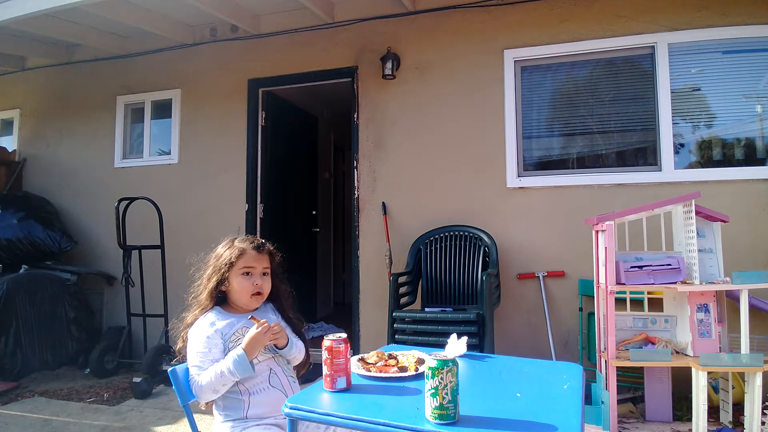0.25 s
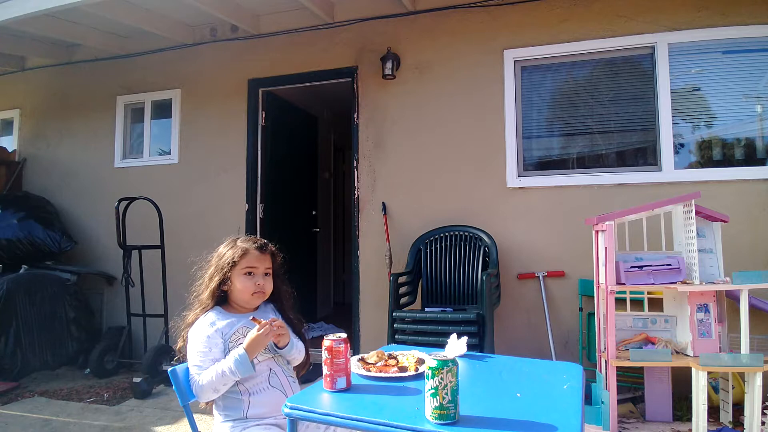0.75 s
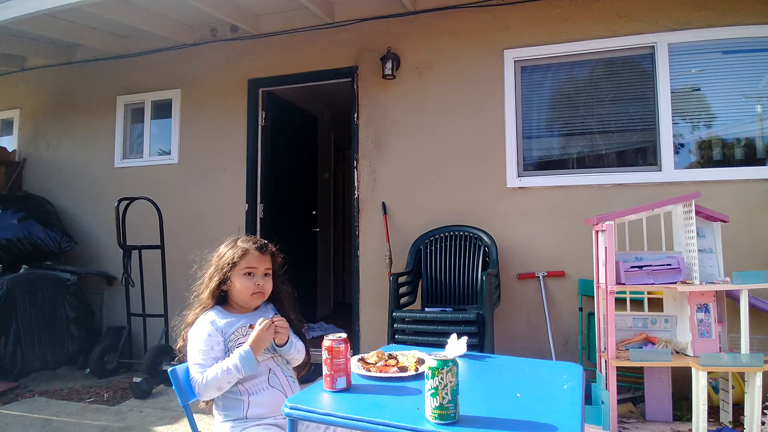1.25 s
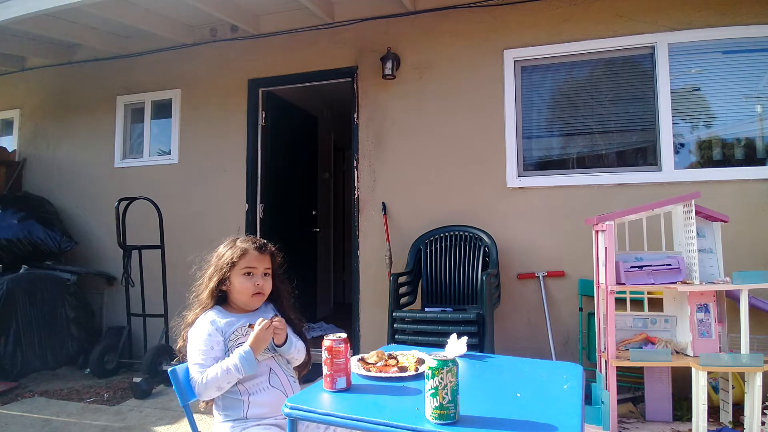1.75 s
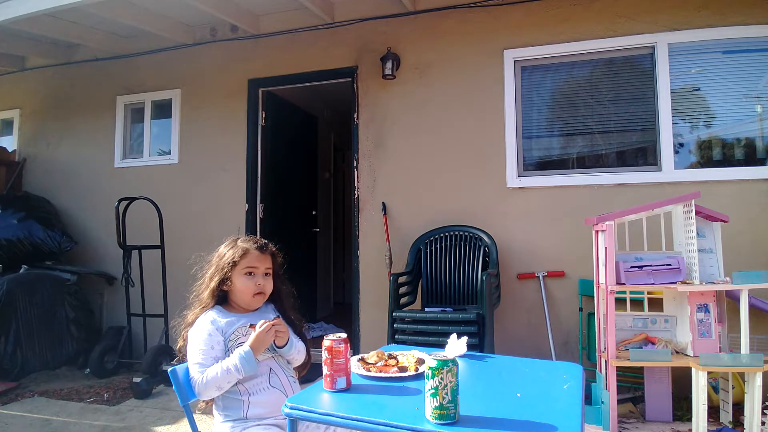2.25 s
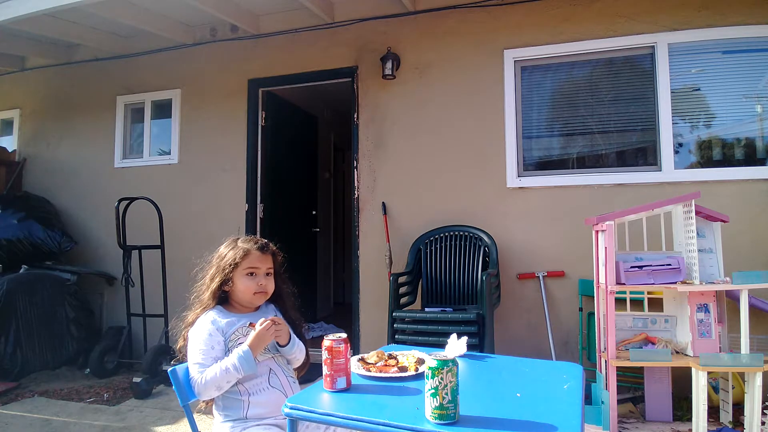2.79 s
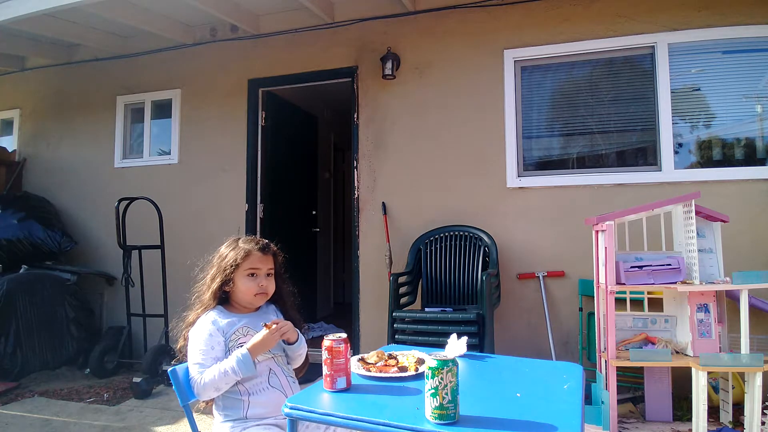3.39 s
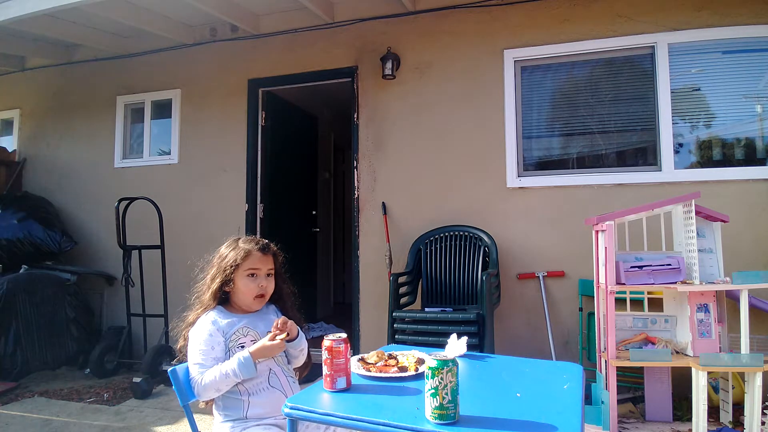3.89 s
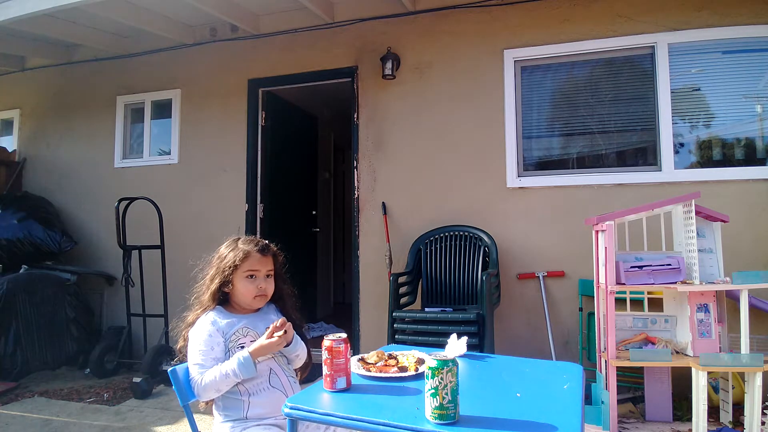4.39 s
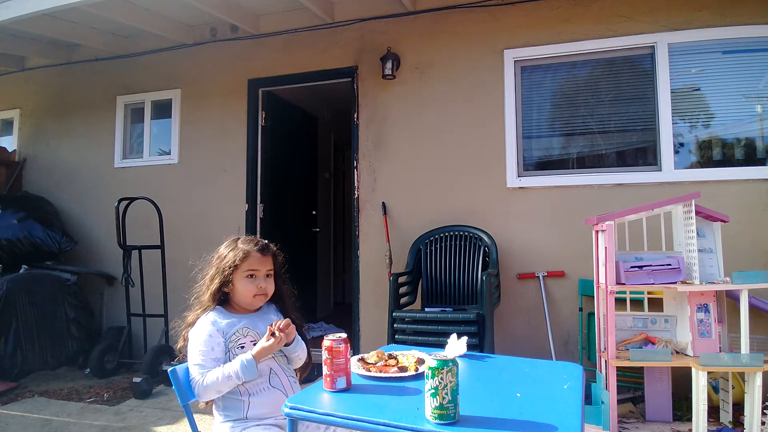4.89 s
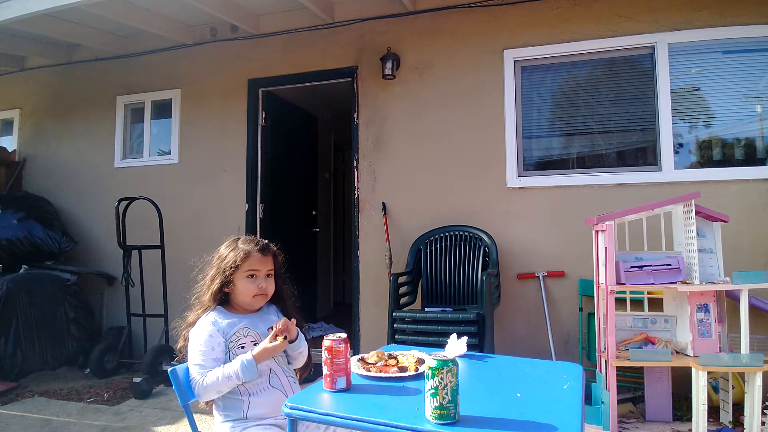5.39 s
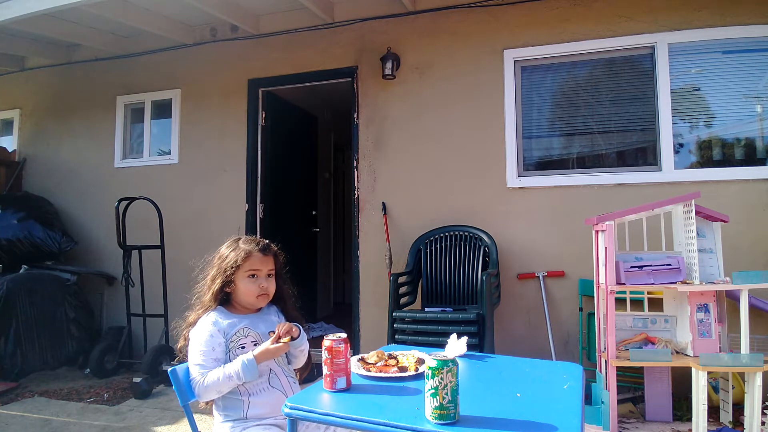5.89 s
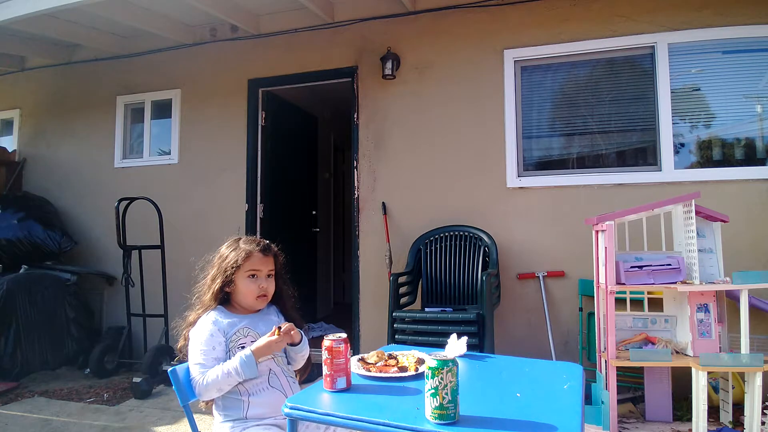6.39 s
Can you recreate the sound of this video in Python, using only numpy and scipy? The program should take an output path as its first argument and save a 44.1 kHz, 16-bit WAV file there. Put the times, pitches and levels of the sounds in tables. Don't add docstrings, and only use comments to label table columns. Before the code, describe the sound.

In an outdoor back yard, a heavy diesel vehicle passes on a street beyond the house. From 0 s a muffled low roar rises quickly, its engine drone around 65 Hz strongest near 1 s, with soft fan hiss and a very faint high turbo whistle slowly climbing. Around 1.6 s the treble opens briefly through a gap; by 2.5 s the sound sags and the drone drops out for a gear change. From 3 s it builds again, clearer, with tyre wash. Tiny chirps and spits begin near 3.8 s. At about 4.3 to 4.5 s, the loudest moment, two short airy valve puffs overlap a small squeak near 4 kHz. Faint spits follow until 5 s. The whistle falls and dies away, the roar recedes, and a firm 70 Hz drone, gently wavering, continues to 6.6 s. Distant stereo pickup, with thinned treble.

```python
import sys
import numpy as np
from scipy import signal
from scipy.io import wavfile
from scipy.ndimage import uniform_filter1d

SR = 44100
rng = np.random.default_rng(int(sys.argv[2]) if len(sys.argv) > 2 else 0)


def generate_wav(signal):
    frames = np.transpose(np.atleast_2d(signal))
    scaled = np.clip(frames, -1, 1) * 32767
    pcm = np.round(scaled).astype(np.int16)
    wavfile.write(sys.argv[1], SR, pcm)


N = 293265
T = np.arange(N) / SR

# time_s, direct_view_share (0-1), left_lead_samples
VIEW = [(0, 0, 4.9), (2.3, 0.1, 1.3), (3.1, 0.5, 0.73), (4.2, 1, 0.47), (4.8, 0.89, 4.2),
        (6.65, 0.54, 2.66)]
# time_s, nearness_db
NEARNESS = [(0, -11), (.15, -7), (.6, -5), (1, 0), (1.55, 0.5), (2.1, -1.5), (2.55, -3), (3.05, 0),
            (3.6, 1), (4.4, 7.5), (4.9, 7), (5.4, 4), (5.9, 1), (6.3, -2), (6.65, -5)]
# time_s, half_length_s, level_db
GAPS = [
    (1.626, 0.44, 8),
    (3.052, 0.31, 7),
    (4.8, .06, 5),
    (5.026, 0.071, 3),
]
# level_db (at nearness 0), nearness_share, full_view_gain_db, drift_db_per_s, gap_share
LAYERS = [
    (-47, 0.85, -2, 0.64, .1),
    (-50.5, 1.18, -2.5, 0.61, -0.056),
    (-57, 0.83, 7.5, -0.2, 0.27),
    (-63, 0.77, 3, 0, 0.45),
    (-83, 0.34, 24.5, -3, 1.2),
]
LAYER_EDGES_HZ = [300, 1000, 3250]
# pitch_hz, level_db_per_hz
SCREENED_COLOUR = [(26, -42), (45, -10), (70, -6), (96, -3), (134, 1.5), (299, -14.5), (327, -17),
                   (433, -16.5), (527, -20.5), (731, -15.5), (833, -18.5), (2820, -33), (3300, -39),
                   (4450, -36), (4970, -29), (8200, -37.5), (10700, -72), (18000, -120)]
# pitch_hz, level_db_per_hz
OPEN_COLOUR = [(26, -44), (45, -19), (57, -1.5), (75, -20), (98, 3), (182, -15.5), (208, -13.5),
               (378, -21.5), (493, -23.5), (551, -18), (981, -33), (2540, -30.5), (3550, -38.5),
               (5910, -39.5), (9000, -44), (11700, -79), (19800, -120)]
# pitch_hz, likeness (0-1)
STEREO_LIKENESS = [(60, 0.99), (150, 0.98), (380, 0.96), (950, 0.83), (2380, 0), (5980, 0.32), (15000, 0.0)]
# pitch_hz, left_minus_right_db
STEREO_TILT = [(60, -0.5), (150, -0.5), (380, 0.5), (950, -2.5), (2380, -4), (5980, -6.0), (15000, -15.5)]
# time_s, pitch_hz, level_db
DRONE = [
    [(0, 67, -59), (.45, 64, -51), (.92, 64.7, -43), (1.58, 66.9, -52.5), (2.05, 68, -50),
     (2.35, 63.6, -57)],
    [(4.0, 70.6, -65), (4.4, 70.1, -40.5), (4.8, 71.34, -34.5), (5.2, 70.8, -27.5), (5.9, 69.6, -28.5),
     (6.65, 71.2, -30.5)],
]
# time_s, depth_db
ECHO_NULLS = [
    (1.84, 17),
    (4.56, 8),
    (5.37, 5),
    (6.1, 5),
    (6.46, 3.5),
]
# start_s, end_s, start_pitch_hz, end_pitch_hz, width_hz
ORDERS = [(.7, 2.2, 131, 136, 5), (-.4, 2.3, 185, 181, 3), (.2, 2, 262, 260, 7), (.5, 1.6, 292, 302, 8),
          (1, 2.1, 422, 440, 14), (0, 2.6, 705, 760, 20), (.4, 1.1, 1290, 1290, 70), (3.0, 3.6, 78, 84, 6),
          (3.3, 4.9, 94, 97, 3), (2.9, 5.5, 180, 181, 6), (2.8, 4.8, 240, 250, 5), (4.7, 6, 264, 258, 5),
          (4.4, 5.9, 385, 375, 8), (3.3, 5.5, 566, 550, 16), (3.4, 5.4, 605, 610, 14),
          (5.3, 6.2, 615, 600, 35), (5.4, 7, 590, 575, 35), (3.4, 6, 768, 785, 12), (4.6, 7.2, 123, 126, 3),
          (0, 3.6, 2800, 2850, 120), (4.5, 6.9, 143, 141, 4), (.55, 2.1, 485, 500, 14)]
ORDER_LEVELS = [-46, -54, -54, -54.5, -55.5, -57, -61.5, -48, -48, -47.5, -55, -47.5, -48, -49.5, -53, -48,
                -55, -54, -52, -70, -63, -61]
# time_s, pitch_hz, level_db
TURBO = [(0, 7740, -71.5), (.55, 7880, -73.5), (1.2, 8360, -74), (1.75, 8770, -73.5), (2.5, 9120, -75),
         (3.5, 9420, -72), (4.1, 9750, -69.5), (4.5, 9800, -68), (4.9, 9740, -74), (5.2, 9420, -75),
         (5.6, 8764, -87), (6.65, 7450, -98)]
# start_s, loudest_s, end_s, level_db
UPPER_WHISTLE = [
    (1.0, 1.697, 2.9, -73),
    (2.1, 3.201, 5.2, -75.5),
]
# pitch_hz, level_db_per_hz
INTAKE_COLOUR = [(5590, -30), (9500, -1), (10600, -5.5), (11900, -4.5), (14300, -2.5), (15100, -7),
                 (15500, -12)]
# start_s, level_db, length_s
PUFFS = [
    (4.32, 0, .095),
    (4.45, -2, .06),
    (4.02, -14, .01),
    (4.79, -14, .03),
    (3.885, -13, .005),
    (4.95, -15, .03),
]
# pitch_hz, level_db_per_hz
PUFF_COLOUR = [(880, -32), (1500, -22), (2400, 8.5), (3540, -3), (4060, 4.5), (4700, -0.5), (7010, 1),
               (10800, -15), (13500, -23), (15500, -23)]
# time_s, pitch_hz, length_s, level_db
SQUEAKS = [
    (3.775, 3980, .03, -62),
    (4.385, 3960, .07, -54),
    (4.02, 3990, .03, -60),
    (4.18, 3970, .03, -64),
    (4.27, 3970, .03, -60),
]
# pitch_hz, drop_below_neighbours_db
THINNING = [(6000, 40), (8000, 4), (9500, 1.6), (11500, 2), (13000, 4), (15300, 3), (15600, 0)]


def gain_of(db):
    return 10 ** (np.asarray(db) / 20)


def evened(x):
    return x / np.sqrt(np.mean(x ** 2) + 1e-20)


def read(points, hz):
    f, value = np.transpose(points)
    return np.interp(np.log(hz + 1), np.log(f + 1), value)


def column(rows, index, t):
    rows = np.array(rows)
    return np.interp(t, rows[:, 0], rows[:, index])


def whistle(hz, width_hz, clean):
    hop = 16
    r, steps = np.exp(-np.pi * width_hz * hop / SR), N // hop + 2
    wander = rng.standard_normal(2 * steps) + 1j * rng.standard_normal(2 * steps)
    wander = signal.lfilter([1], np.convolve([1, -r], [1, -r]), wander)[steps:]
    wander = clean + (1 - clean) * wander / np.sqrt(np.mean(abs(wander) ** 2))
    wander = np.interp(np.arange(N) / hop, np.arange(steps), wander)
    carrier = np.exp(2j * np.pi * np.cumsum(hz) / SR)
    return evened((wander * carrier).real)


def pair(x, hz):
    late = np.interp(np.arange(N) - column(VIEW, index=2, t=T), np.arange(N), x)
    return np.array([x, late]) * gain_of(read(STEREO_TILT, hz) / 2 * np.array([[1], [-1]]))


def noise(field_db, hz, t, size, patchy_db):
    a, b, c, d, patches = rng.standard_normal((len(t), len(hz), 5)).T
    patches = uniform_filter1d(patches, size=10, axis=0)
    patches = evened(uniform_filter1d(patches, size=12, axis=1))
    same = np.clip(read(STEREO_LIKENESS, hz), -1, 1)[:, None]
    right = a + 1j * b
    lag = np.exp(2j * np.pi * hz[:, None] * column(VIEW, index=2, t=t) / SR)
    left = same * lag * right + np.sqrt(1 - same ** 2) * (c + 1j * d)
    tilt_db = read(STEREO_TILT, hz)[:, None] / 2 * np.array([1, -1])[:, None, None]
    z = np.array([left, right]) * gain_of(field_db + patchy_db * patches + tilt_db)
    return signal.istft(z, nperseg=size, noverlap=size * 3 // 4)[1][:, :N] * np.sqrt(2 / 3)


def layer_db(index, t):
    base_db, share, view_db, drift_db, gap_share = LAYERS[index]
    gap_db = sum(db * np.exp(-((t - s) / half) ** 2) for s, half, db in GAPS)
    near_db = share * column(NEARNESS, index=1, t=t)
    return base_db + near_db + view_db * column(VIEW, index=1, t=t) + drift_db * t + gap_share * gap_db


def roar():
    hz, t = np.fft.rfftfreq(2048, 1 / SR), np.arange(N // 512 + 5) * 512 / SR
    view = np.clip(column(VIEW, index=1, t=t), 0, 1)
    top_hz = np.minimum(hz, 8000)
    screened_db = read(SCREENED_COLOUR, top_hz)[:, None]
    colour = (1 - view) * screened_db + view * read(OPEN_COLOUR, top_hz)[:, None]
    band = np.digitize(hz, LAYER_EDGES_HZ)
    trim = np.zeros_like(colour)
    for k in range(4):
        inside = (band == k) & (hz > 90) & (hz < 8500)
        colour_power = (gain_of(colour[inside]) ** 2).sum(0)
        trim[band == k] = layer_db(index=k, t=t) - 10 * np.log10(colour_power)
    past_hz = hz[:, None] - column(TURBO, index=1, t=t)
    colour += -4 * np.clip(past_hz / 400, 0, 1) - 4 * np.maximum(past_hz, 0) / 1000
    colour -= 5 * np.maximum(hz - 7500, 0)[:, None] / 1000
    field_db = colour + uniform_filter1d(trim, size=7, axis=0) + 4
    return noise(field_db, hz, t, size=2048, patchy_db=1.39)


def drone():
    out = np.zeros(N)
    for rows in DRONE:
        fade = np.clip(np.minimum(T - rows[0][0] + .05, rows[-1][0] - T + .1) / .1, 0, 1)
        tone = whistle(column(rows, index=1, t=T), width_hz=3, clean=.92)
        out += tone * fade * gain_of(column(rows, index=2, t=T))
    null_s = 0.1
    cancel_db = sum(db * np.exp(-((T - s) / null_s) ** 2) for s, db in ECHO_NULLS)
    return pair(out * gain_of(-cancel_db), hz=70)


def orders():
    out = np.zeros(N)
    for (start, end, hz0, hz1, width_hz), db in zip(ORDERS, ORDER_LEVELS):
        u = np.clip((T - start) / (end - start), 0, 1)
        swell = np.sqrt(abs(np.sin(np.pi * u)))
        clean = .72 * (width_hz < 25)
        out += gain_of(db) * swell * whistle(hz0 + (hz1 - hz0) * u, width_hz, clean)
    return pair(out, hz=400)


def upper_whistle(hz):
    core = whistle(hz, width_hz=260, clean=0)
    return core + .8 * whistle(hz - 500, width_hz=1200, clean=0)


def turbo():
    hz = column(TURBO, index=1, t=T)
    low = np.array([whistle(hz, width_hz=210, clean=.15) for side in range(2)]) * gain_of([[-3], [3]])
    high = np.array([upper_whistle(1.585 * hz) for side in range(2)]) * gain_of([[-10], [5]])
    boost = np.zeros(N)
    for start, top, end, db in UPPER_WHISTLE:
        away = np.maximum((top - T) / (top - start), (T - top) / (end - top))
        boost += gain_of(db - 22.5 * away)
    bins, t = np.fft.rfftfreq(1024, 1 / SR), np.arange(N // 256 + 5) * 256 / SR
    rush = evened(noise(read(INTAKE_COLOUR, bins)[:, None], bins, t, size=1024, patchy_db=1.0))
    rush = rush * gain_of([[-5], [3]]) * gain_of(layer_db(index=4, t=T))
    return low * gain_of(column(TURBO, index=2, t=T)) + high * boost + rush


def valve():
    hz, t = np.fft.rfftfreq(256, 1 / SR), np.arange(N // 64 + 5) * 64 / SR
    air = evened(noise(read(PUFF_COLOUR, hz)[:, None], hz, t, size=256, patchy_db=1.5))
    flow = np.zeros(N)
    for start, db, length in PUFFS:
        tail_db = -150 * np.maximum(T - start - length, 0)
        flow += gain_of(db + tail_db) * np.clip((T - start) / .05, 0, 1)
    squeak = np.zeros(N)
    for s, pitch_hz, length, db in SQUEAKS:
        bell = np.exp(-(2 * (T - s) / length) ** 2)
        squeak += gain_of(db) * bell * whistle(pitch_hz + 0 * T, width_hz=90, clean=.55)
    return gain_of(-40.5) * air * flow + pair(squeak, hz=4000)


def scene():
    return roar() + drone() + orders() + turbo() + valve()


def thinned(x):
    hz, t, z = signal.stft(x, SR, nperseg=2048, window="cosine", noverlap=1024)
    group_db = 10 * np.log10(uniform_filter1d(abs(z) ** 2, size=6, axis=1) + 1e-20)
    under_db = uniform_filter1d(group_db, size=45, axis=1) - group_db
    keep = gain_of(-np.clip(12 * (under_db - read(THINNING, hz)[:, None]), 0, 25))
    return signal.istft(z * keep, SR, nperseg=2048, window="cosine", noverlap=1024)[1][:, :N]


def low_pass(x):
    return signal.sosfilt(signal.butter(12, 15610, fs=SR, output="sos"), x)


def record(dry):
    cut = signal.sosfilt(signal.butter(2, 55, "high", fs=SR, output="sos"), dry)
    hiss = gain_of(-79) * rng.standard_normal(dry.shape)
    return low_pass(thinned(cut + hiss))


dry = scene()
out = record(dry)
generate_wav(out)
```